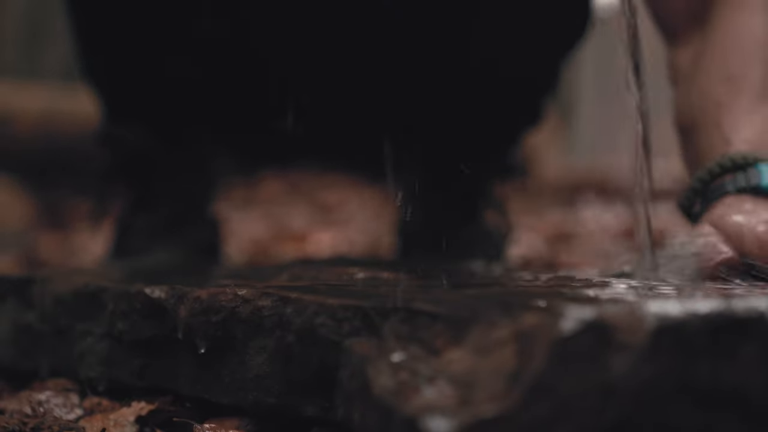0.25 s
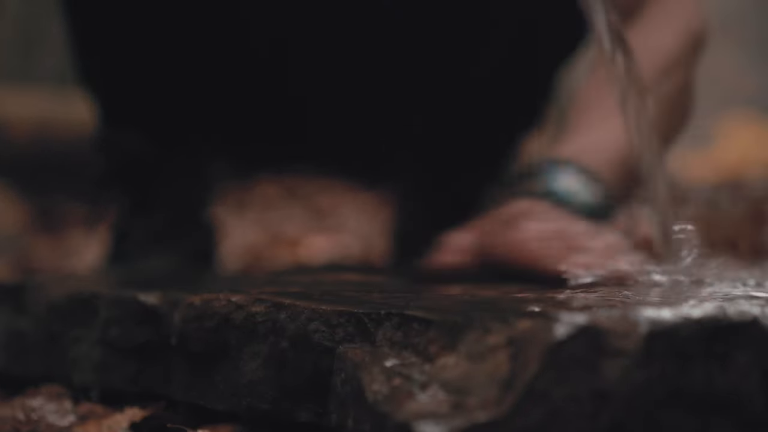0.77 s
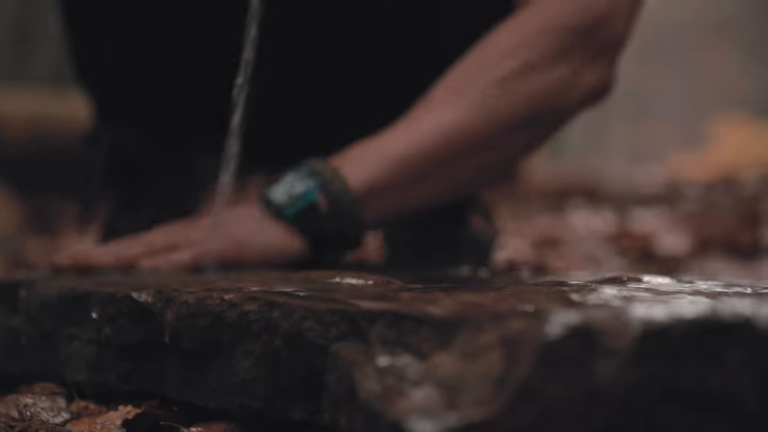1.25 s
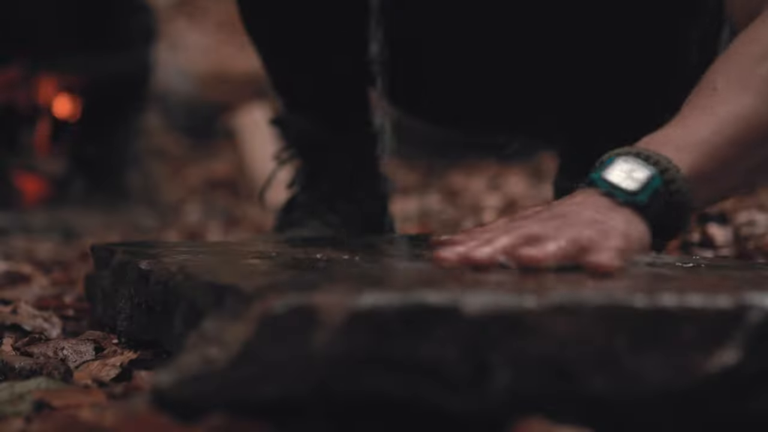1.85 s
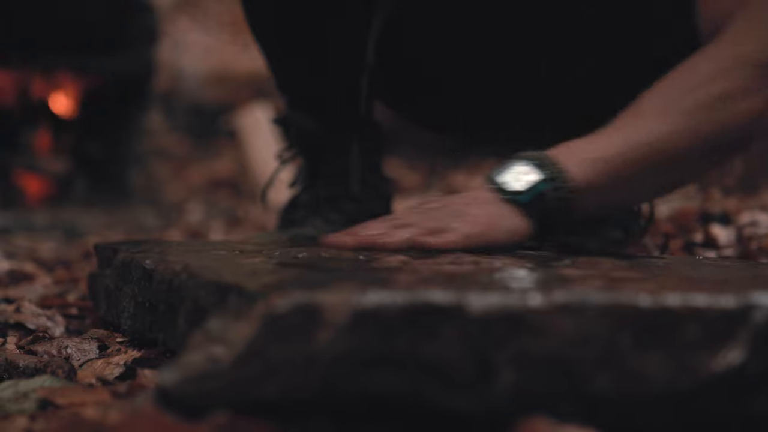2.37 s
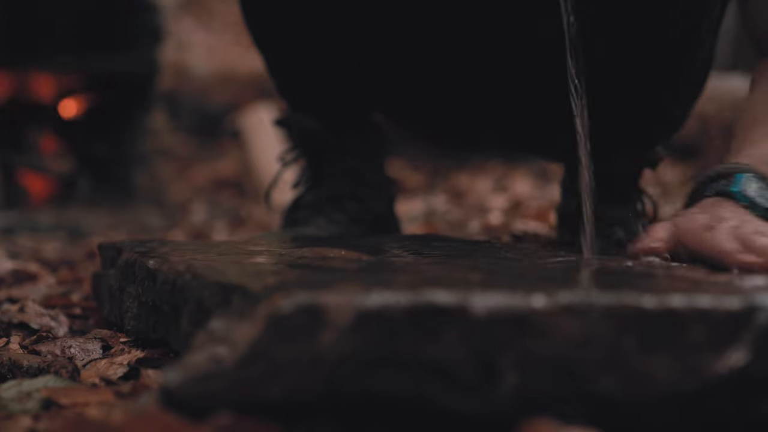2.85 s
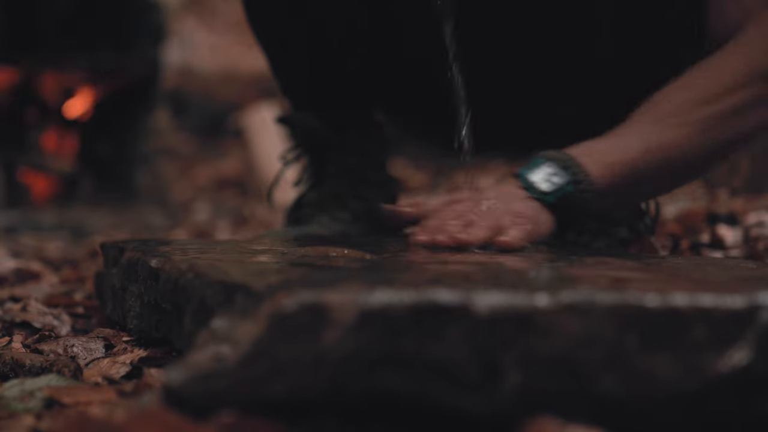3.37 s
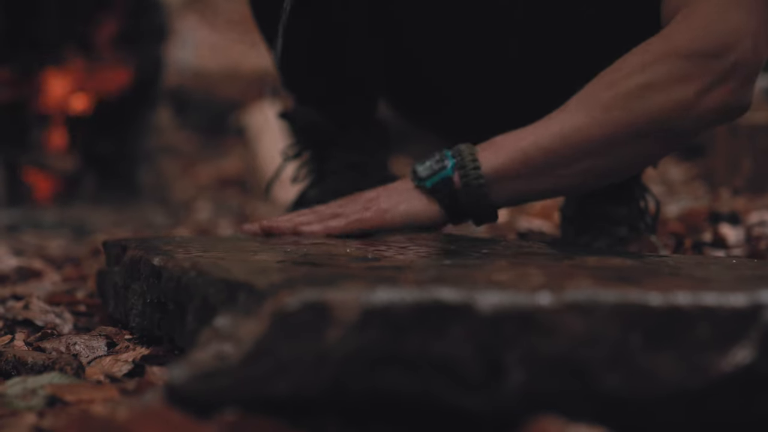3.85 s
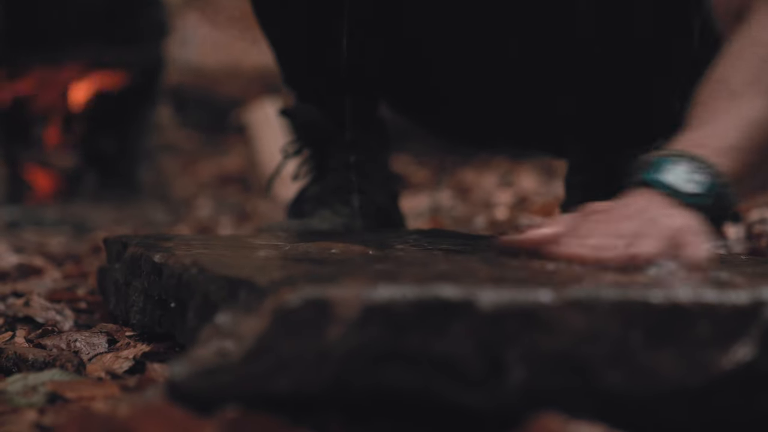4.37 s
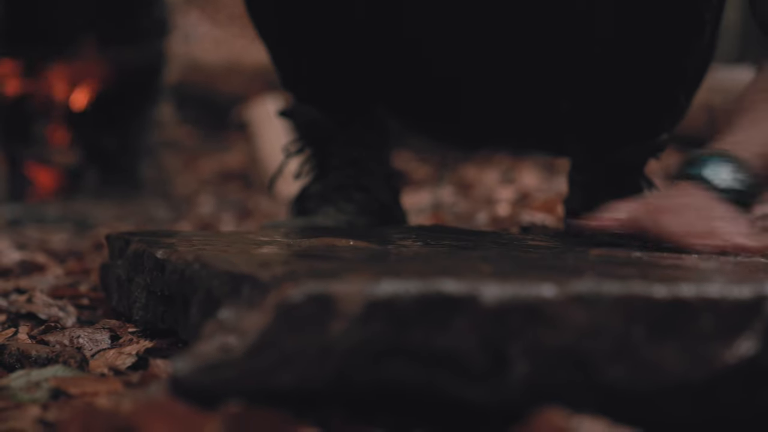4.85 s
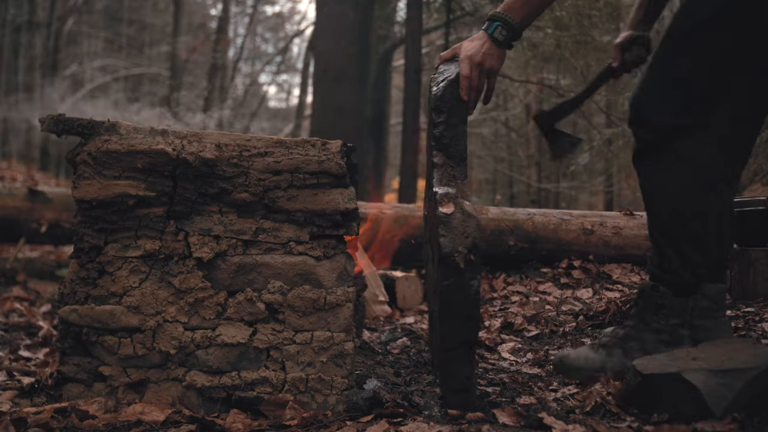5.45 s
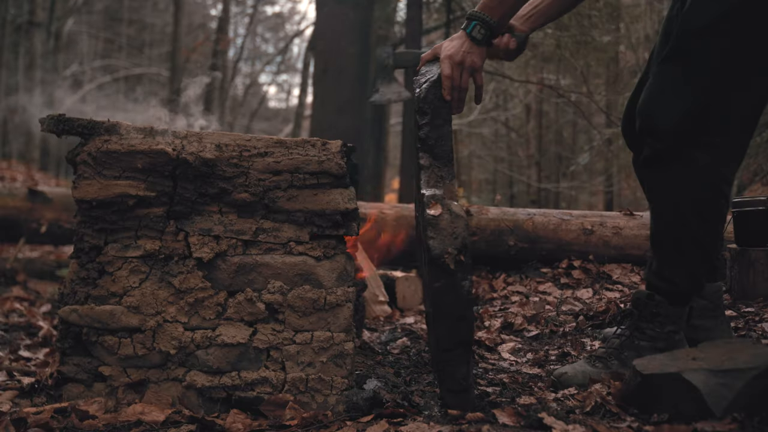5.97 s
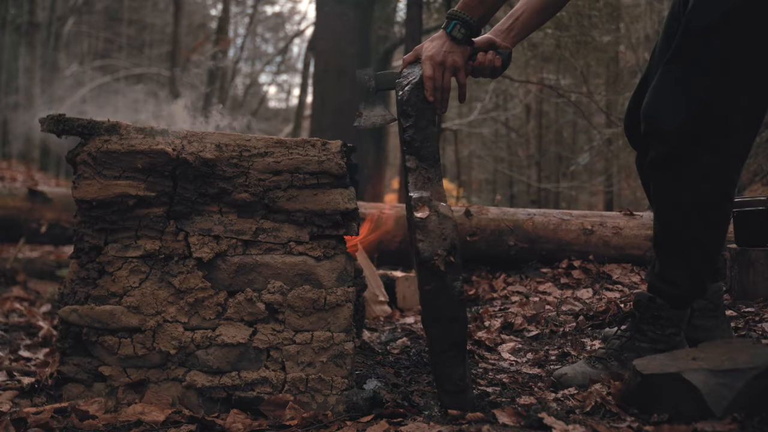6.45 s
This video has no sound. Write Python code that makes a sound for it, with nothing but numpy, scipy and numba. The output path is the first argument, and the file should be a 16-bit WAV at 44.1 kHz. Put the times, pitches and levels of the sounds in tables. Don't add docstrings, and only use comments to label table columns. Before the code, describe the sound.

Outdoors in a quiet wood, a thin stream of water patters on a flat stone while a wet palm sweeps it in slaps, squeaks and fizzing spray. A campfire beside it cracks sharply, loudest from about two to four seconds. After five seconds the water thins to drips, with soft wooden knocks and a few dry leaf ticks over faint fire hiss. Close stereo microphone, short woodland echoes.

```python
import sys
import numpy as np
from scipy import signal
from scipy.io import wavfile
from scipy.ndimage import uniform_filter1d
from numba import njit

SR = 44100
rng = np.random.default_rng(int(sys.argv[2]) if len(sys.argv) > 2 else 0)


def gain_from_db(level_db):
    decades = np.asarray(level_db, float) / 20
    return 10 ** decades


def digitize_waveform(pressure):
    field = np.atleast_2d(pressure).T
    bounded = np.clip(field, -1, 1)
    quanta = np.round(bounded * 32767).astype(np.int16)
    wavfile.write(sys.argv[1], SR, quanta)


N = 295911

# start_s, flow_db, pressure_db
WATER_FLOW = [(0.0, -56.5, -3), (0.35, -64.5, 13.5), (0.8, -48, -0.5), (1.2, -56.5, -6), (1.47, -51.5, 4.5),
              (1.65, -58, -3), (1.9, -54, 9), (2.35, -55, -7), (2.65, -53, -3.5), (3.22, -65.5, 9),
              (3.39, -45, -7.5), (3.72, -58, 0.5), (4.08, -46.5, -5), (4.45, -56, 3), (4.8, -58, -1),
              (5.03, -52, 3.5), (5.25, -59.5, 0.5), (5.9, -59, -9)]


def water():
    s, *columns = np.transpose(WATER_FLOW)
    gurgle_db, pressure_db = (np.interp(np.arange(N) / SR, s, column) for column in columns)
    spray_db = gurgle_db + pressure_db
    full_flow_db = -48.5
    fizz_db = -50.5 + 1.27 * (gurgle_db - full_flow_db) + 0.68 * pressure_db
    gurgle = shower(gurgle_db - 10.0, count=8000, lo_hz=858, hi_hz=2840, cycles=3.37,
                    spread_db=2.5, width_db=0.5, glide=0.13)
    fizz = shower(fizz_db - 2.5, count=15000, lo_hz=1700, hi_hz=7890, cycles=7.1,
                  spread_db=2.0, width_db=30.0, glide=0.073)
    spray = shower(spray_db - 11.5, count=24000, lo_hz=6400, hi_hz=19000, cycles=1.83,
                   spread_db=1.5, width_db=39.5, glide=0.0061)
    return gurgle + fizz + spray + drops() + splashes() + squeaks() + flicks()


def drops():
    # start_s, peak_db, pitch_hz, left_minus_right_db
    drop_bubbles = [(0.321, -37, 3380, -6), (0.606, -37.5, 2030, -9), (0.643, -39, 2720, 9),
                    (0.755, -40, 2950, -1), (0.808, -47, 1560, -11), (0.842, -43.5, 1460, -4),
                    (0.859, -40.5, 1580, -7), (0.9, -42, 3350, -1.5), (0.925, -49.5, 1560, -8),
                    (1.091, -44.5, 1360, 2), (1.131, -46, 1780, -14), (1.553, -38.5, 4500, -6),
                    (2.214, -44, 5100, -3), (2.268, -45, 3040, 3), (2.679, -47, 2150, -9),
                    (2.711, -47, 3060, -2), (3.24, -37.5, 4890, -7), (3.53, -40, 2500, 5),
                    (3.792, -39, 3660, 2), (3.829, -44, 3130, 8), (4.082, -32.5, 3170, 5),
                    (4.184, -37.5, 1580, 0), (4.258, -46, 3900, -3), (4.394, -49.5, 1490, -2),
                    (4.912, -34.5, 3230, 3), (4.979, -38.5, 3000, 3), (5.027, -39, 3070, 3),
                    (5.109, -42.5, 4600, 2), (5.514, -43, 1640, 3), (6.095, -50.5, 1530, -5)]
    s, db, hz, pan_db = np.transpose(drop_bubbles)
    return place(s, db, hz, 7 + 0 * s, pan_db, glide=0.031)


def splashes():
    # start_s, peak_db, centre_hz
    slaps = [(0.379, -38.5, 2220), (0.6454, -35.5, 2930), (0.7412, -30.5, 2930), (0.7839, -29, 4240),
             (0.838, -44, 1630), (1.0905, -37, 1700), (1.3793, -48, 1600), (1.5204, -39, 1700),
             (2.5696, -34.5, 1810), (3.3233, -38, 3950), (3.4, -38, 2790), (3.4214, -40, 1890),
             (4.0938, -30, 1570), (4.1822, -27, 1640), (4.2093, -51, 2150), (4.449, -38, 3080),
             (4.5302, -34, 2450), (4.5983, -44, 1530), (4.658, -40, 2370), (4.9099, -28.5, 3100),
             (4.98, -33.5, 3030), (5.0284, -32, 3100), (5.0594, -59, 1620), (5.109, -36.5, 4570),
             (5.828, -53, 1790), (5.8591, -46, 1980)]
    t60_s, bubbles_per_slap = 0.082, 110
    s, db, hz = np.repeat(np.transpose(slaps), repeats=bubbles_per_slap, axis=1)
    u = rng.random((len(s), 6)).T
    after_s = 0.52 * t60_s * u[0]
    size_db = db - 17.0 - 60 * after_s / t60_s + 7 * u[4]
    pitch_hz = hz * 2 ** (1.59 * (u[1] + u[5] - 1))
    swarm = place(s + after_s, size_db, pitch_hz, 0.95 + 5 * u[2], 8 * u[3] - 9, glide=0.26)
    return band(swarm, 720, 12000)


def squeaks():
    # start_s, peak_db, pitch_hz
    palm_bubbles = [(0.744, -47, 3060), (0.783, -45, 4270), (0.806, -37, 4560), (1.191, -48, 1700),
                    (1.459, -39, 4700), (1.518, -53, 1570), (3.205, -44, 6100), (3.292, -41, 5900),
                    (3.324, -40, 3800), (3.351, -32, 4020), (3.355, -33, 7100), (3.398, -36, 4440),
                    (3.421, -42, 3050), (3.486, -43, 1800), (4.336, -53, 4530), (4.369, -53, 1180),
                    (4.529, -48, 2260), (4.619, -53, 1500), (4.64, -51, 1510)]
    s, db, hz = np.transpose(palm_bubbles)
    return place(s, db, hz, 6.3 + 0 * s, -5 + 0 * s, glide=0.082)


def flicks():
    # start_s, peak_db
    flung_droplets = [(0.1187, -44), (0.2554, -43.5), (0.3205, -42), (0.3402, -42), (0.376, -46.5),
                      (0.3933, -39.5), (0.462, -47), (0.6324, -39), (0.684, -43.5), (1.009, -40.5),
                      (1.426, -44), (1.521, -37), (1.5527, -40), (2.5666, -39.5), (2.7086, -43.5),
                      (2.95, -39.5), (3.197, -47), (3.2116, -38), (3.232, -40), (3.2942, -39), (3.316, -42),
                      (3.3303, -44), (3.342, -39), (4.024, -44.5), (4.889, -36), (4.9085, -33.5),
                      (4.975, -47), (5.017, -53), (5.065, -42), (5.485, -43.5)]
    s, db = np.transpose(flung_droplets)
    return crackle(s + 0.0014, db - 4.5, pan_db=-5, t60_s=0.027, lo_hz=4930)


def sweeps():
    # start_s, length_s, level_db, centre_hz
    strokes = [(0.282, .15, -64.5, 7330), (0.621, 0.23, -65, 7300), (0.621, 0.29, -70.5, 12300),
               (1.368, 0.21, -69.5, 9000), (2.759, 0.093, -69, 6000), (3.198, 0.066, -65.5, 11000),
               (3.283, 0.1, -61.5, 12100), (3.3, .07, -60, 6000), (4.479, .18, -65, 2620),
               (4.88, 0.057, -59.5, 11000), (4.885, .05, -55, 2700), (4.96, .12, -61, 3080),
               (4.961, 0.13, -74.5, 10200)]
    edge_s, pan_db, bubbles_per_stroke = 0.016, -6.5, 500
    s, length_s, db, hz = np.repeat(np.transpose(strokes), repeats=bubbles_per_stroke, axis=1)
    u = rng.random((len(s), 6)).T
    edge = np.clip(np.minimum(u[0], 1 - u[0]) * length_s / edge_s, .05, 1)
    size_db = db + 10 * np.log10(length_s * hz / bubbles_per_stroke) + 20 * np.log10(edge)
    size_db = size_db - 3.2 * np.log(1 - u[1])
    pitch_hz = hz * 2 ** (0.63 * (u[2] + u[3] - 1))
    return place(s + u[0] * length_s, size_db, pitch_hz, 1.0 + 6 * u[4],
                 pan_db + 12 * (u[5] - .5), glide=0.04)


def trickle():
    # start_s, peak_db, pitch_hz
    stream_bubbles = [(0.5178, -53, 1240), (0.5417, -48, 1940), (0.5876, -51, 1650), (0.6689, -54, 2020),
                      (0.6886, -55, 1000), (0.7044, -56, 1530), (0.7398, -48.5, 1420), (0.779, -50, 1530),
                      (0.875, -53, 900), (0.9767, -49, 1350), (1.0097, -46, 1630), (1.0296, -54, 1500),
                      (1.079, -52, 1490), (1.1556, -52, 2250), (1.293, -51, 1090), (1.3978, -52, 1610),
                      (1.4357, -46, 2170), (1.4841, -46, 2170), (1.5105, -48, 2170), (1.6048, -50, 2100),
                      (3.299, -44, 1250), (3.396, -44, 810), (4.073, -42, 1140), (4.096, -38, 1620),
                      (4.103, -38, 3070), (4.4353, -50, 2160), (4.4855, -46, 3110), (4.547, -42, 3070),
                      (4.58, -49, 2870), (4.6892, -54, 1480), (5.0035, -44, 3170)]
    s, db, hz = np.transpose(stream_bubbles)
    return place(s, db, hz, 5 + 0 * s, -4 + 0 * s, glide=0.06)


def runoff():
    s, flow_db, _ = np.transpose(WATER_FLOW)
    plop_db = np.interp(np.arange(N) / SR, s, flow_db) - 27
    return shower(plop_db, count=1500, lo_hz=280, hi_hz=750, cycles=3.5,
                  spread_db=3.5, width_db=3.0, glide=0.12)


def mist():
    # start_s, peak_db, left_minus_right_db
    fine_ticks = [(0.1092, -48, -4), (0.1206, -46, 0), (0.2957, -27, -2), (0.463, -42, -2),
                  (0.6394, -46, -5), (1.008, -41.5, -3), (1.5209, -42, -10), (1.8253, -56, -1),
                  (2.347, -46.5, -1), (2.6594, -52, -10), (2.765, -48, 5), (3.1338, -46, 4),
                  (3.1971, -41, -6), (3.213, -43, -5), (3.244, -46, -6), (3.287, -47, -7),
                  (3.3303, -42, -5), (3.343, -40, -5), (3.395, -43, -3), (3.412, -48, -3),
                  (3.6466, -43, 3), (4.3994, -48, -3), (4.9596, -48, -6), (4.976, -36, -11),
                  (5.0185, -42, -4), (5.8297, -40, -4), (5.9388, -38, 3)]
    s, db, pan_db = np.transpose(fine_ticks)
    return crackle(s + 0.00043, db, pan_db, t60_s=0.011, lo_hz=9000)


def fire():
    # start_s, peak_db, pitch_hz, left_minus_right_db
    low_pops = [(0.168, -23, 1610, 3), (1.775, -30, 2200, -9), (1.842, -9, 1480, -1),
                (1.941, -29, 1700, -2), (2.569, -37, 1800, -10), (2.925, -32.5, 2470, 5),
                (3.296, -39, 1500, -3), (3.37, -11, 2100, -7), (3.704, -21, 1570, 0), (3.87, -9, 1760, 1),
                (3.916, -37, 2370, -22), (4.067, -26, 1700, -4), (4.162, -22.5, 2040, 1),
                (4.209, -30.5, 1980, 3), (4.3008, -25, 1000, 1), (5.513, -38, 1000, 1),
                (6.277, -42, 1100, 0), (4.891, -38.5, 2400, -14), (5.572, -23, 2150, 0),
                (5.594, -30.5, 2180, 0), (6.211, -32, 1360, -1), (6.568, -31, 2480, -1),
                (6.656, -37, 2070, -2)]
    # start_s, peak_db, pitch_hz, cycles, left_minus_right_db
    high_pops = [(0.168, -32, 2470, 3, 11), (1.774, -4.5, 3420, 1.77, 2), (1.8427, -12, 3050, 3.3, 8),
                 (1.9397, -29.5, 3530, 0.82, 2), (2.569, -31.5, 3330, 2.4, 1),
                 (2.8106, -23.5, 3580, 1.24, 1), (2.9261, -37, 4360, 3.4, -4),
                 (3.294, -25.5, 5000, 1.04, 1), (3.704, -19.5, 4400, 1.46, 2), (3.8707, -22, 2730, 3.4, 15),
                 (3.916, -3.5, 3300, 1.46, 2), (4.1627, -31, 3400, 1.4, 23), (4.2103, -36, 4640, 3.4, -5),
                 (4.8928, -25, 3600, 1.3, 2), (5.569, -35, 3060, 1.6, 14), (5.937, -45, 3770, 3.1, 0),
                 (6.2114, -23.5, 3580, 0.84, 3.5), (6.6575, -22.5, 4100, 1.06, 1)]
    # start_s, peak_db, pitch_hz, cycles, left_minus_right_db
    top_rings = [(1.7741, -12, 4800, 1.5, 1.5), (1.7743, -22, 6100, 2.5, 1), (1.8435, -21, 4800, 4.4, -9),
                 (3.8698, -30, 4650, 5.1, -2.0), (3.916, -12.5, 4670, 1.36, 2)]
    # start_s, peak_db, pitch_hz, cycles, left_minus_right_db
    hollow_rings = [(3.3701, -6, 2850, 3.06, 9), (3.3703, -11, 4800, 2.3, 2), (4.3007, -7, 3380, 4.2, 7),
                    (4.067, -11.5, 4780, 3.6, -1), (4.3017, -23, 4600, 6.1, 15),
                    (4.3013, -19.5, 5550, 4.6, -8), (4.3022, -18, 6980, 9.4, 4)]
    hollow, bright = bursts(hollow_rings), sparks()
    low = [(s, db, hz, 1.13, pan_db) for s, db, hz, pan_db in low_pops]
    hollow_share, spark_share = gain_from_db([-10, -2])
    echoing = bursts(low + high_pops + top_rings) + hollow_share * hollow + spark_share * bright
    return surroundings(echoing) + (1 - hollow_share) * hollow + (1 - spark_share) * bright


def bursts(table):
    s, db, hz, cycles, pan_db = np.transpose(table)
    pops = place(s + .0004, db, hz, np.maximum(cycles, 1.0), pan_db, glide=0.)
    lag = 0.93
    pops[1] = np.interp(np.arange(N) - lag, np.arange(N), pops[1])
    return band(pops, 274, 17000)


def sparks():
    # start_s, peak_db, left_minus_right_db
    spark_ticks = [(0.1693, -32, 1), (0.2950, -36.5, 0), (1.0916, -40.5, -3), (1.3758, -45, -2),
                   (1.6388, -40.5, 1), (1.7734, -19, 2), (3.467, -50, -6), (1.8414, -18.5, 0.5),
                   (2.8072, -32.5, -2), (2.9243, -43, 5), (3.37, -31.5, -3), (3.704, -42, 3),
                   (3.827, -40.5, 2), (3.8696, -28.5, -1), (3.916, -29.5, 0), (4.0657, -17.5, 4),
                   (4.1614, -27, 0), (4.209, -30, 2), (4.2564, -45, -1), (4.301, -29.5, 2), (4.529, -39, 6),
                   (4.659, -36.5, -2), (5.5733, -34, -3), (5.5942, -33, 2), (5.682, -44, 1),
                   (5.8297, -47, 2), (5.86, -42.5, 1), (5.9378, -42, 3), (6.212, -41, -2),
                   (6.6588, -39.5, 2)]
    s, db, pan_db = np.transpose(spark_ticks)
    return crackle(s + 0.00053, db + 2.0, pan_db, t60_s=0.012, lo_hz=3170)


def knocks():
    # start_s, peak_db
    ground_thuds = [(0.166, -57), (1.773, -82), (1.84, -36), (1.937, -55), (2.808, -52.5), (2.923, -62),
                    (3.369, -36.5), (3.703, -51.5), (3.869, -39.5), (3.915, -49), (4.067, -50.5),
                    (4.3, -46), (5.512, -51), (5.569, -58), (6.163, -60)]
    # start_s, peak_db, pitch_hz
    wood_knocks = [(0.167, -40, 650), (0.453, -53, 546), (0.989, -56, 450), (1.84, -31, 834),
                   (1.939, -42, 950), (3.37, -22.5, 850), (3.87, -34, 820), (3.914, -64, 635),
                   (4.162, -45, 870), (4.979, -48, 800), (5.512, -39.5, 450), (5.53, -44, 870),
                   (5.571, -32, 1090), (6.275, -45, 525), (6.312, -47, 855)]
    rows = [(s, db, 234.5, 2.18) for s, db in ground_thuds]
    rows += [(*row, 1.38) for row in wood_knocks]
    s, db, hz, cycles = np.transpose(rows)
    return band(place(s + 0.001253, db, hz, cycles, 0 * s, glide=0.), 88, 4400)


def leaves():
    # start_s, peak_db
    leaf_ticks = [(4.808, -47.5), (5.5147, -47), (5.533, -47), (5.807, -45.5), (6.096, -49),
                  (6.2766, -46.5), (6.568, -44.5)]
    s, db = np.transpose(leaf_ticks)
    return crackle(s + 0.00055, db, pan_db=-0.6, t60_s=0.03, lo_hz=880)


def surroundings(x):
    # level_db, t60_s, top_hz
    tails = [
        (-14, 0.073, 21000),
        (-32, 0.82, 10000),
    ]
    # delay_ms, left_db, right_db, smear_ms
    reflections = [(20.5, -25, -25, 1.0), (2.7, -18, -18, .3), (7.0, -19, -19, .9), (11.5, -17, -17, 1.1),
                   (17.3, -21, -21, 1.3)]
    t = np.arange(SR // 2) / SR
    echo = np.zeros((2, len(t)))
    for db, t60_s, top_hz in tails:
        noise = band(pair(len(t), apart=0.44), 230, top_hz)
        echo += gain_from_db(db - 23.5) * 10 ** (-3 * t / t60_s) * noise
    echo = echo * (1 - np.exp(-t / 0.00027))
    for delay_ms, left_db, right_db, smear_ms in reflections:
        rough = np.exp(-.5 * ((1000 * t - delay_ms) / smear_ms) ** 2) * pair(len(t), apart=1.0)
        rough[:, int(delay_ms * SR / 1000)] = 2.6
        size = np.sqrt(np.sum(rough ** 2, axis=1, keepdims=True))
        dulled = band(rough, 690, 13000 / (1 + delay_ms / 30))
        echo = echo + gain_from_db([[left_db], [right_db]]) * dulled / size
    return ground(x, db=-8) + signal.fftconvolve(x, echo, axes=1)[:, :N]


def ground(x, db):
    lag = 58
    return x + gain_from_db(db) * np.roll(uniform_filter1d(x, size=2, axis=1), lag, axis=1)


def wood():
    # pitch_hz, level_db (per Hz)
    hiss_tone = np.array([(18, -72), (30, -61), (212, -9), (314, -12.5), (1340, -3.5), (2220, -0.5),
                          (4070, -3.5), (13000, -18.5), (15200, -17), (16500, -39)])
    out = 0
    for hz in 40 * 2 ** np.arange(0, 8.8, .5):
        mid, side = band(rng.standard_normal((2, N)), hz / 2 ** .25, hz * 2 ** .25)
        db = np.interp(np.log(hz), np.log(hiss_tone[:, 0]), hiss_tone[:, 1]) + 1.1 * walk(9)
        out = out + gain_from_db(db) * (mid + min(hz / 1300.0, .95) * side * np.array([[1], [-1]]))
    return unit(out) * gain_from_db(-57.5)


def shower(db, count, lo_hz, hi_hz, cycles, spread_db, width_db, glide):
    u = rng.random((count, 6)).T
    size_db = np.minimum(-spread_db * np.log(1 - u[1]), 11.0)
    pitch_hz = lo_hz * (hi_hz / lo_hz) ** ((u[2] + u[5]) / 2)
    grains = place(u[0] * N / SR, size_db, pitch_hz, cycles * (0.26 + 1.0 * u[3]),
                   width_db * (2 * u[4] - 1), glide)
    return unit(grains) * gain_from_db(db + 2.6 * walk(55) + 1.5 * walk(14))


def crackle(s, db, pan_db, t60_s, lo_hz):
    kicks = np.zeros((2, N))
    for ear, sign in enumerate((1, -1)):
        np.add.at(kicks[ear], np.clip(s * SR, 0, N - 1).astype(int), gain_from_db(db + sign * pan_db / 2))
    t = np.arange(SR // 20) / SR
    one_fade = (1 - np.exp(-t / .0003)) * 10 ** (-3 * t / t60_s)
    fade = signal.fftconvolve(kicks, [one_fade])[:, :N]
    noise = pair(N, apart=3.5)
    return fade * unit(band(noise, lo_hz, 12700) + 0.47 * band(noise, 10700, 14200))


def place(s, db, hz, cycles, pan_db, glide):
    side = np.array([[1.], [-1.]]) * pan_db / 2
    lag_per_db = 0.35
    start = np.clip(s * SR - lag_per_db * side, 0, N - 1)
    return rings(start, np.clip(hz, 50, 17000.), np.clip(cycles, .3, 40), glide, gain_from_db(db + side), N)


@njit
def rings(start, hz, cycles, glide, gain, length):
    out = np.zeros((2, length + 8192))
    for e in range(len(hz)):
        tau = cycles[e] / hz[e] * SR / 2.2
        for c in range(2):
            first = int(start[c, e]) + 1
            for i in range(min(int(6 * tau), 8000)):
                t = i + first - start[c, e]
                turn = hz[e] * t / SR * (1 + glide * t / (6 * tau))
                swell = (t / tau) ** 2 * np.exp(2 - 2 * t / tau)
                out[c, first + i] += gain[c, e] * swell * np.sin(2 * np.pi * turn)
    return out[:, :length]


def pair(length, apart):
    return rng.standard_normal(length) + apart * rng.standard_normal((2, length))


def walk(rate):
    k = int(SR / rate)
    held = np.repeat(rng.standard_normal(N // k + 1), k)
    return 1.3 * uniform_filter1d(uniform_filter1d(held, k), k)[:N]


def band(x, lo_hz, hi_hz):
    return signal.sosfilt(signal.butter(2, [lo_hz, hi_hz], "band", fs=SR, output="sos"), x)


def unit(x):
    return x / np.sqrt(np.mean(x ** 2))


def scene():
    wet = ground(water() + trickle() + sweeps(), db=-10)
    near = fire() + knocks() + leaves()
    return wet + runoff() + mist() + near + wood()


def top_cut(x):
    return signal.sosfilt(signal.butter(12, 17010, fs=SR, output="sos"), x)


def record(dry):
    x = signal.sosfilt(signal.butter(2, 68, "high", fs=SR, output="sos"), dry)
    x = signal.sosfilt(signal.butter(2, 15500, fs=SR, output="sos"), x)
    x = signal.sosfilt(signal.ellip(8, .3, 70, 16000, fs=SR, output="sos"), x)
    return top_cut(x)


dry = scene()
out = record(dry)
digitize_waveform(out)
```